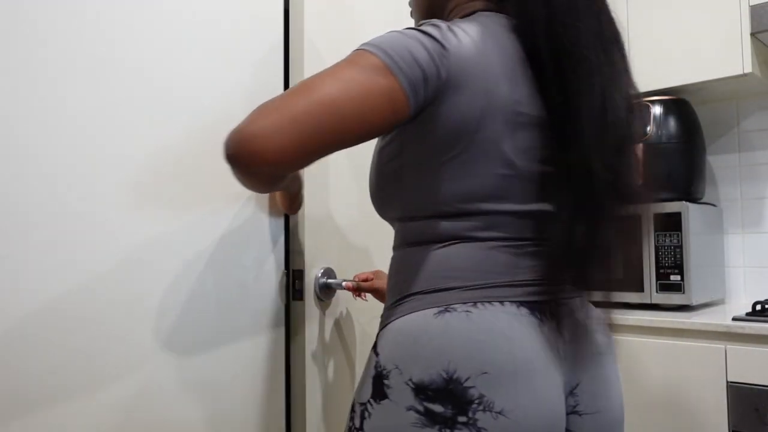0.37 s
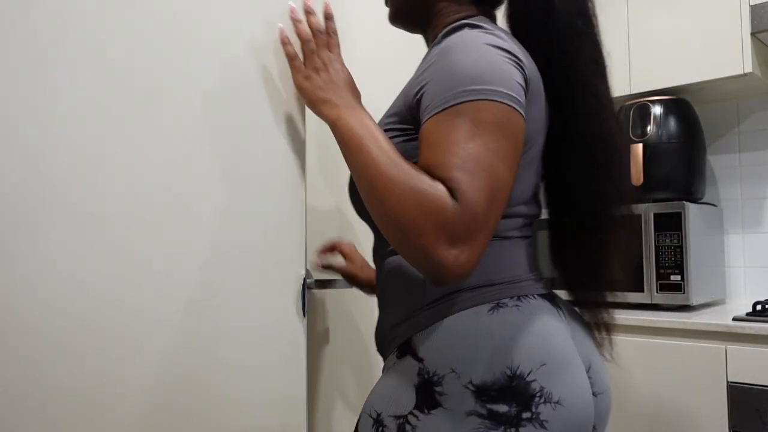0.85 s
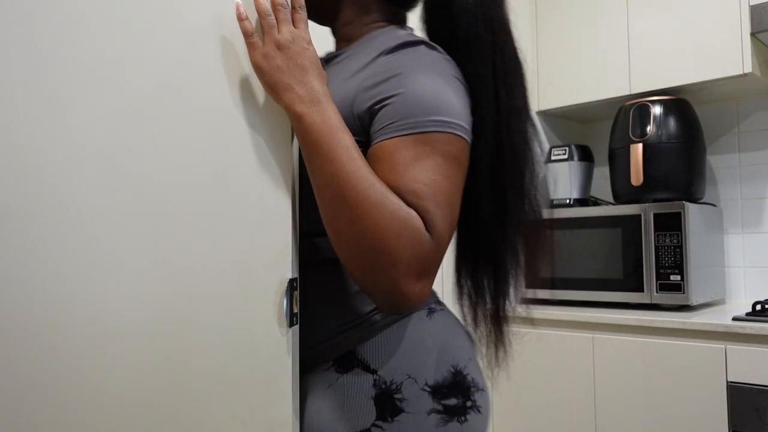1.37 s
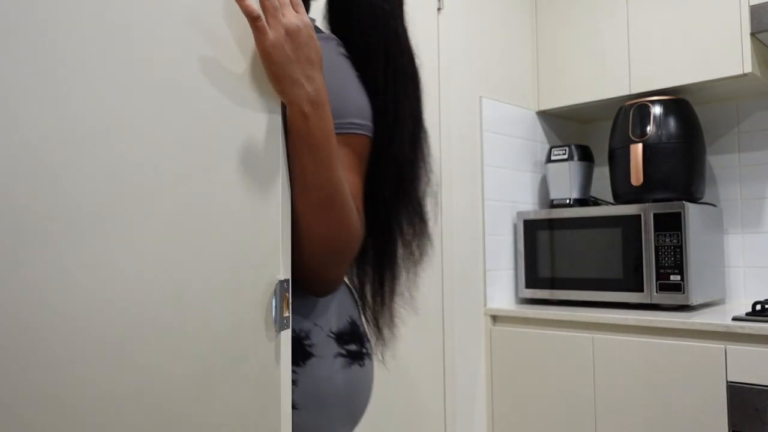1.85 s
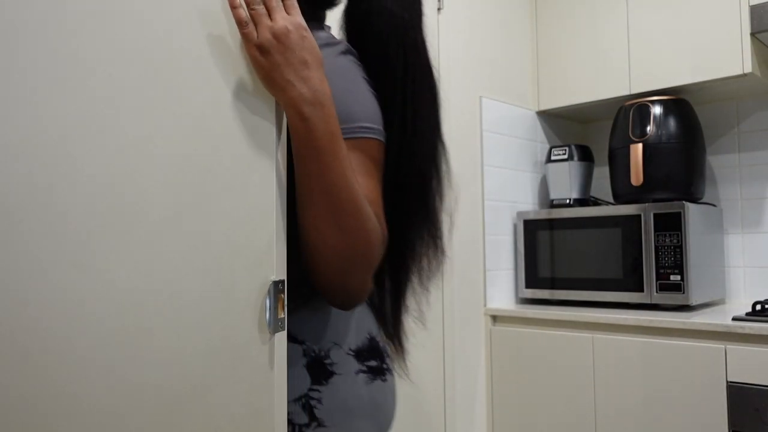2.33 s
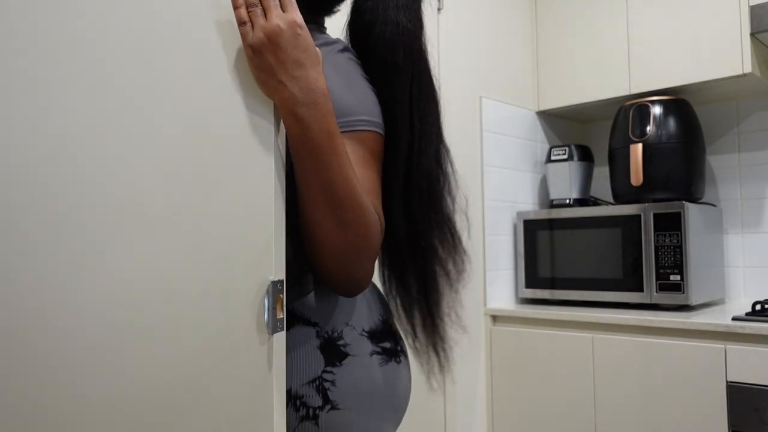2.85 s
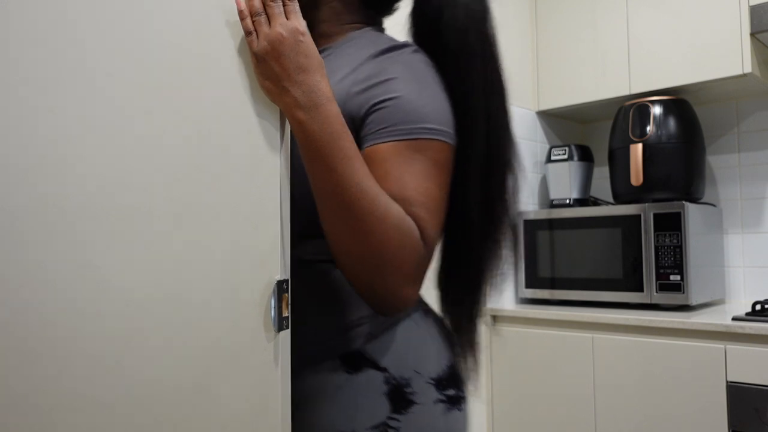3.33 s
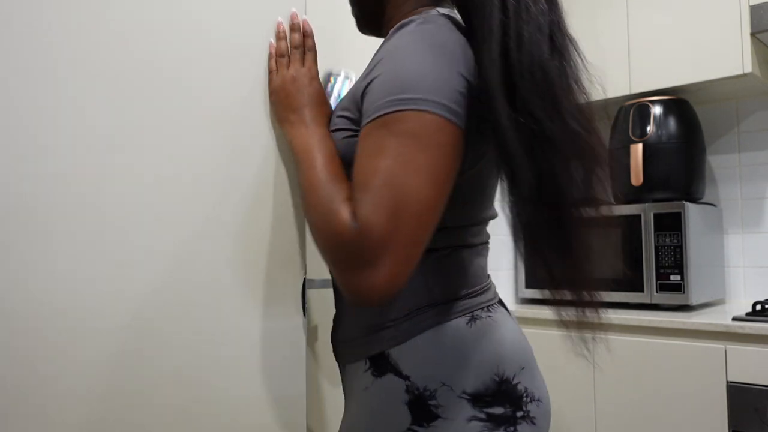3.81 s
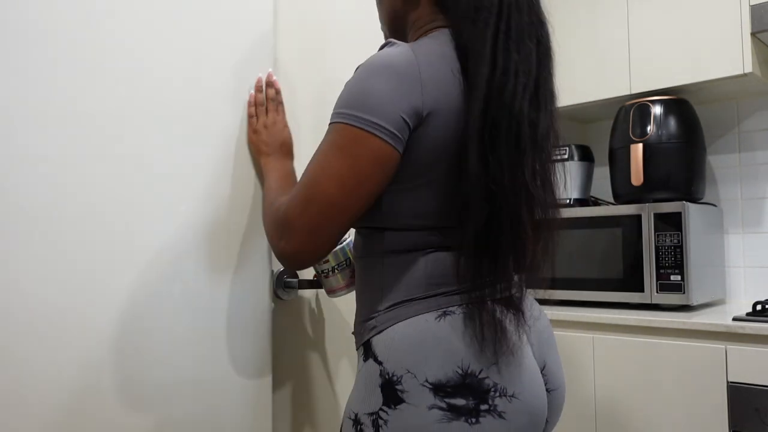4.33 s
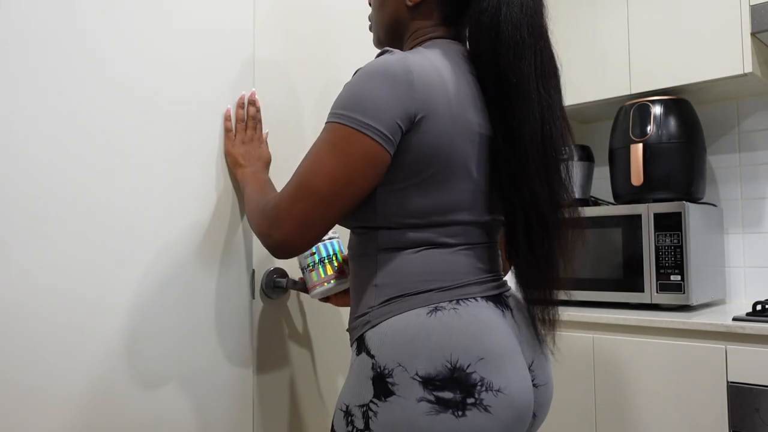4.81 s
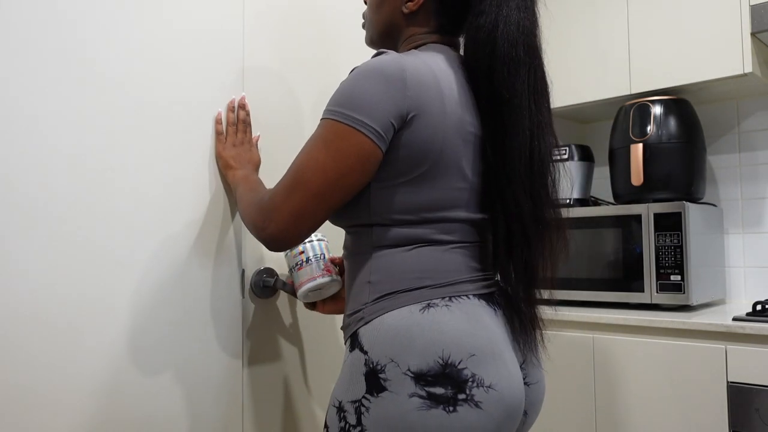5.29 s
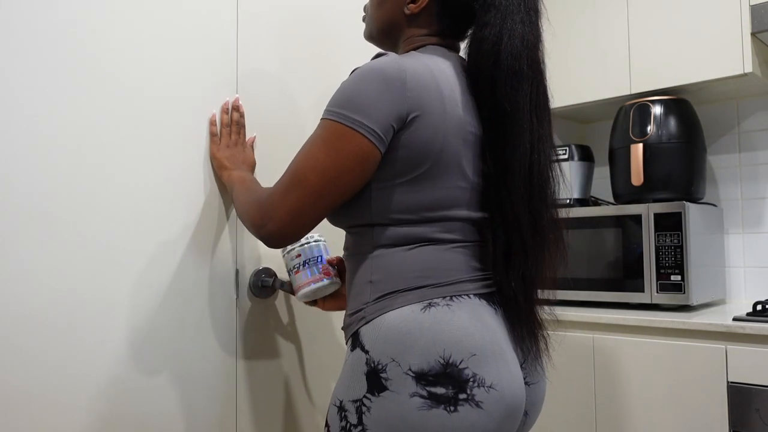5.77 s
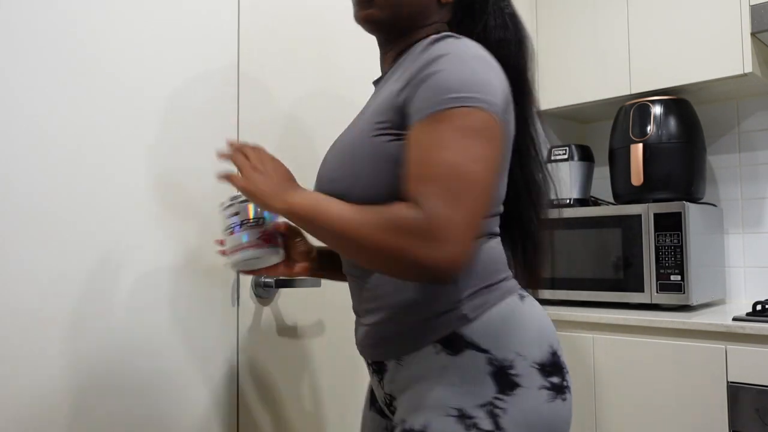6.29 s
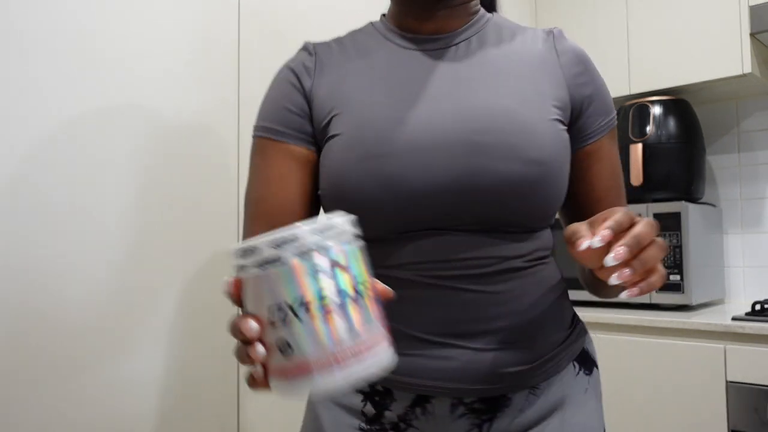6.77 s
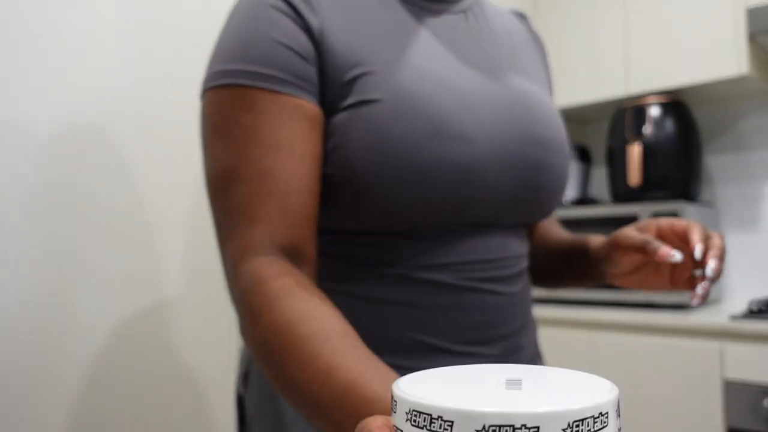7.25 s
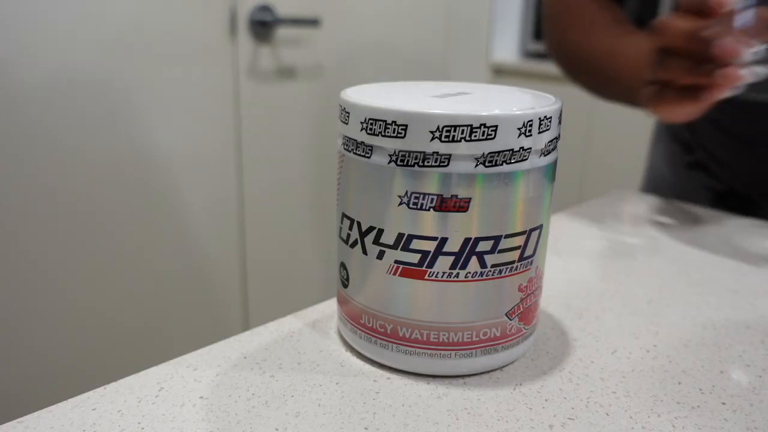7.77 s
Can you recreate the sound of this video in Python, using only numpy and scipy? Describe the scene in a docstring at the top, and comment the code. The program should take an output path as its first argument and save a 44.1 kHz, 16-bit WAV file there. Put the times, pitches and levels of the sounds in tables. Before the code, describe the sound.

Quiet kitchen tone with low rumbling and light hiss, heard by a nearby stereo microphone. Sleeves and hands brush softly. A jar shifts on a wooden shelf with a short hollow clatter, and later a tiny ping. Then a tall door is pushed shut: an uneven series of hard metallic latch clacks, edge knocks and low thumps in a short bright echo. Last comes a tight plastic knock on a stone counter.

```python
"""Low rumbling noise, soft hiss and the rustle of clothes and hands run throughout; things shift on a shelf early on.
A tall pantry door is pushed shut: its latch and handle rattle several times while the panel booms.
Last, a plastic tub is set down on a stone counter. Two microphone ports hear nearly the same sound.
Rumble, hiss and rustle are shaped noise. Each contact is a short gritty scrape through resonances, with
ringing tones, a dull push and the echo of hard walls."""
import sys
import numpy as np
from scipy import signal
from scipy.fft import rfft, irfft, next_fast_len
from scipy.io import wavfile
from scipy.ndimage import uniform_filter1d

SR = 44100
rng = np.random.default_rng(int(sys.argv[2]) if len(sys.argv) > 2 else 0)


def invert_db(x):
    """Field ratio 10**(x/20) for x, a level in decibels (scalar or array-like)."""
    u = np.asarray(x, float) / 20
    return 10 ** u


def store_wav(level_fs):
    """Save 16-bit WAV to argv[1]."""
    pcm = np.round(np.clip(np.atleast_2d(level_fs), -1, 1) * 32767)
    wavfile.write(sys.argv[1], SR, pcm.T.astype(np.int16))


N = 347375  # samples in the scene
SPAN = SR * 3 // 4  # samples kept for one contact and its echo


def unit(x):
    """Scaled to rms 1."""
    return x / np.sqrt(np.mean(x ** 2) + 1e-20)


def along(points, hz):
    """Reads a curve of (pitch_hz, value) points, with pitch on a log axis."""
    point_hz, value = np.transpose(points)
    return np.interp(np.log(hz + 1), np.log(point_hz + 1), value)


def filtered(x, response):
    """Sound whose frequencies are each multiplied by a response, which may be complex."""
    size = next_fast_len(x.shape[-1] + SR // 2)  # spare room lets the ringing die away
    spectrum = rfft(x, size) * response(np.fft.rfftfreq(size, 1 / SR))
    return irfft(spectrum, size)[..., :x.shape[-1]]


def resonances(peaks):
    """Response of parts that ring after being driven: a sum of (pitch_hz, width_hz, level_db) peaks."""
    return lambda f: sum(invert_db(db) * 1j * f * width / (hz * hz - f * f + 1j * f * width)
                         for hz, width, db in peaks)


def ports(mid, side, apart):
    """Left and right from a shared sound and a sound added to one port and taken from the other."""
    side = filtered(side, lambda hz: invert_db(along(apart, hz)))
    return np.array([mid + side, mid - side])


def swell(peak_s, db, rise_db, fall_db):
    """Gain that climbs to a peak and fades, both at a steady rate in dB per second."""
    t = np.arange(N) / SR - peak_s
    return invert_db(db - np.where(t < 0, -abs(rise_db) * t, abs(fall_db) * t))


def rush(spectrum, apart, patchy_db):
    """Stereo noise of rms 1 with patches of random gain over time and pitch."""
    cells = signal.stft(rng.standard_normal((2, N + 512)), nperseg=512)[2]
    patches = uniform_filter1d(rng.standard_normal(cells.shape[1:]), size=6, axis=0)
    patches = uniform_filter1d(patches, size=8, axis=1)
    pair = signal.istft(cells * invert_db(patchy_db * unit(patches)), nperseg=512)[1][:, :N]
    mid, side = filtered(pair, lambda hz: invert_db(along(spectrum, hz)))
    return unit(ports(mid, side, apart))


# low rumbling noise over time, stronger during the door contacts: start_s, level_db
RUMBLE_LEVEL = [(0, -51), (.3, -58.5), (.9, -59.5), (1.1, -63.5), (1.7, -60), (2.2, -60.5), (3, -60),
                (3.6, -59), (4.1, -53), (4.6, -54), (7.2, -54.5), (7.88, -64)]
# colour of the rumble: pitch_hz, level_db per Hz
RUMBLE_COLOUR = [(18, -70), (30, -30), (76, -12.5), (134, -10.5), (162, 1), (195, -2.5), (262, -5),
                 (339, -13.5), (500, -20.5), (650, -29), (1100, -120)]
# colour of the hiss: pitch_hz, level_db per Hz
HISS_COLOUR = [(180, -45), (300, -2), (398, -8), (574, -5), (1870, -12), (3580, -19), (6000, -20.5),
               (13100, -25.5), (16000, -24.5)]
# how far the ports differ in far noise: pitch_hz, side_db relative to mid
FAR_DIFFERENCE = [(60, -6), (180, -10.5), (550, -4.5), (1650, -4.5), (4970, -6), (15000, -20)]


def background():
    """Low rumbling noise whose level changes, stronger during the door contacts, over steady hiss."""
    rumble_gain = invert_db(np.interp(np.arange(N) / SR, *np.transpose(RUMBLE_LEVEL)))
    rumble = rumble_gain * rush(RUMBLE_COLOUR, FAR_DIFFERENCE, patchy_db=0.7)
    hiss = invert_db(-61.5) * rush(HISS_COLOUR, FAR_DIFFERENCE, patchy_db=1)
    return rumble + hiss


# strokes of cloth and skin: peak_s, body_db, treble_db, swelling in dB per s, fading in dB per s
STROKES = [(.02, -68, -79, 200, 60), (.45, -74, -69, 300, 110), (.676, -69, -66, 350, 250),
           (1.222, -66, -56.5, 200, 150), (1.31, -53, -56.5, 150, 120), (1.69, -68.5, -59.5, 61, 113),
           (2.3, -50, -46.5, 296, 2000), (2.75, -69, -92, 500, 63), (3.1, -94, -67.5, 600, 23),
           (3.334, -61.5, -63, 1200, 150), (3.944, -61.5, -54.5, 60, 44), (4.332, -77, -46.5, 1500, 152),
           (6.648, -56.5, -50.5, 56, 77), (7.048, -56.5, -49.5, 458, 155), (7.5, -61.5, -62, 93, 37)]
# colour of the strokes' body: pitch_hz, level_db per Hz
CLOTH_COLOUR = [(800, -15), (1600, -10.5), (2600, 0), (3600, -5.5), (6000, -30)]
# colour of the strokes' treble: pitch_hz, level_db per Hz
SHEEN_COLOUR = [(3000, -5.5), (5500, -0.5), (9000, -7), (15500, -14.5)]
# how far the ports differ in near sound: pitch_hz, side_db relative to mid
NEAR_DIFFERENCE = [(60, -30), (200, -29), (600, -11.5), (2000, -15), (6000, -22.5), (12000, -18)]


def rustle():
    """Sleeves and palms slide over skin and paint: patchy noise that swells and fades with each stroke."""
    body = sum(swell(s, db, rise_db, fall_db) for s, db, _, rise_db, fall_db in STROKES)
    treble = sum(swell(s, db, rise_db, fall_db) for s, _, db, rise_db, fall_db in STROKES)
    cloth = body * rush(CLOTH_COLOUR, NEAR_DIFFERENCE, patchy_db=4)
    sheen = treble * rush(SHEEN_COLOUR, NEAR_DIFFERENCE, patchy_db=3.5)
    return cloth + sheen


def ring(modes, attack_s, scatter_db):
    """Fading tones of a struck object, struck with new strengths each time."""
    t = np.arange(SPAN) / SR
    tones = np.zeros(SPAN)
    for hz, db, t60_s in modes:
        strength_db = db + scatter_db * rng.standard_normal()
        tones += invert_db(strength_db - 60 * t / t60_s) * np.sin(2 * np.pi * hz * t)
    return tones * (1 - np.exp(-t / attack_s))


# how long the echo of the hard walls lasts: pitch_hz, t60_s (time to fade by 60 dB)
ECHO_TIME = [(100, 0.7), (400, 0.5), (1500, 0.57), (4000, 0.43), (8000, 0.42), (15000, 0.14)]


def kitchen(x, wet_db):
    """Direct sound, shaded a little at one port, plus a fresh tail whose pitches die at their own speeds."""
    lead_s = 8e-6  # direct sound reaches one port this much before the other
    hz, t, cells = signal.stft(rng.standard_normal((2, SPAN)), SR, nperseg=256)
    fade = invert_db(-60 * t / along(ECHO_TIME, hz)[:, None])
    tail = signal.istft(cells * fade, SR, nperseg=256)[1][:, :SPAN]
    tail = tail * (1 - np.exp(-np.arange(SPAN) / SR / 0.00058))  # echoes thicken as walls join in
    tail = tail / np.linalg.norm(tail[0])
    mid, side = invert_db(wet_db) * signal.fftconvolve(x[None], tail, axes=1)[:, :SPAN]
    lead = np.gradient(x) * SR * lead_s / 2  # adding a little slope shifts a sound slightly earlier
    return ports(x + mid, side - 0.2 * x, NEAR_DIFFERENCE) + [lead, -lead]


# bright part of a contact: pitch_hz, level_db per Hz
BRIGHT_COLOUR = [(4000, -5.5), (7000, -9), (11000, -20), (16000, -44)]
# dull body of a push: pitch_hz, level_db per Hz
THUD_COLOUR = [(30, -43), (70, -6), (130, 8), (220, 3), (330, -19), (600, -43)]


def blows(events, low, middle, high, attack_s, thud_db, thud_hz, wet_db):
    """Each contact is a short gritty scrape through the hard parts and a push that rings the soft ones."""
    out = np.zeros((2, N + SPAN))
    t = np.arange(SPAN) / SR
    short = SPAN // 4  # samples kept for the scrape
    for start_s, db, low_db, middle_db, treble_db, centre_hz, scrape_s in events:
        u = t[:short] / max(scrape_s, .0002)
        grit = rng.standard_normal((2, short)) * u * np.exp(-u)

        # the row's centre sets a broad colour; small modes vary in level at random
        peaks = [(centre_hz, 0.95 * centre_hz, 0)]
        peaks += [(hz, width, level - 7.0 + 2.2 * rng.standard_normal()) for hz, width, level in high]
        hard = filtered(grit[0], lambda hz: resonances(peaks)(hz) / (1 + 1j * hz / (2.35 * centre_hz)) ** 2)
        bright = filtered(grit[1], lambda hz: invert_db(along(BRIGHT_COLOUR, hz)))
        crack = hard / np.abs(hard).max() + invert_db(treble_db) * bright / np.abs(bright).max()

        # the push: noise weakened below thud_hz, fading by 60 dB in 0.44 s
        thud = unit(filtered(rng.standard_normal(SPAN),
                             lambda hz: invert_db(along(THUD_COLOUR, hz)) / (1 + (thud_hz / (hz + 1)) ** 4)))
        thud = invert_db(thud_db - 60 * t / 0.44) * (1 - np.exp(-t / attack_s)) * thud
        boom = ring(low, attack_s, scatter_db=1) + thud

        knock = invert_db(middle_db) * ring(middle, attack_s / 2, scatter_db=3.5)
        knock[:short] += crack
        contact = kitchen(knock, wet_db) + invert_db(low_db) * ports(boom, -boom, NEAR_DIFFERENCE)
        start = round((start_s - .6 * scrape_s) * SR)  # the scrape swells before it is heard as a blow
        out[:, start:start + SPAN] += invert_db(db) * contact
    return out[:, :N]


# things shifted on a shelf: start_s, hard_db, board_db and treble_db relative to hard, hard_centre_hz
SHELF_CONTACTS = [(.222, -45, -27, -25, 2620), (.264, -34.5, -29.5, -7.5, 2000), (.685, -59, 7, -16, 1200),
                  (2.305, -28, -13, -23, 1460), (2.324, -22, -8.5, -14.5, 1440),
                  (2.345, -32.5, -1.5, -25, 1280)]
# tones of the shelf board: pitch_hz, level_db (relative), t60_s
BOARD_TONES = [(132, -28, 0.18), (195, 7, 0.15), (234, -1.5, 0.33), (295.4, 0, 0.18)]
# tones of the jars: pitch_hz, level_db (relative), t60_s
JAR_TONES = [(321, 2, 0.055), (382, 1, 0.061), (438, -2.5, 0.066), (530, -3, 0.05), (600, -4, 0.051),
             (697, -16, 0.07)]
# resonances of the shelf goods: pitch_hz, width_hz, level_db (relative)
CLATTER_PEAKS = [(955, 55, -17), (1470, 57, 7.5), (2420, 120, -17), (3330, 230, -1), (5750, 74, -3)]


def shelf():
    """Things shift on a board: what shakes the board shakes the jars on it."""
    rows = []
    for s, db, board_db, treble_db, hz in SHELF_CONTACTS:
        jar_db = 5 + 0.82 * board_db  # relative to the hard part
        rows.append((s, db, board_db, jar_db, treble_db, hz, .007))  # scrape length in s
    return blows(rows, BOARD_TONES, JAR_TONES, CLATTER_PEAKS, attack_s=0.0055, thud_db=3, thud_hz=112, wet_db=2)


# faint wavering tones inside the pantry: pitch_hz, level_db (relative, applied twice)
WHINE_TONES = [(972, -2), (1450, 0), (2040, -6), (2450, -3)]
# their one swell: peak_s, level_db, swelling in dB per s, fading in dB per s
WHINE_RISE = (2, -69, 35, 70)


def whine():
    """Faint wavering tones: narrow bands of noise that swell and fade."""
    lines = [(hz, 14, db) for hz, db in WHINE_TONES]  # each resonance is 14 Hz wide
    tones = filtered(rng.standard_normal(N), lambda hz: resonances(lines)(hz) ** 2)  # squared: narrower
    return swell(*WHINE_RISE) * unit(tones)


# tones of a small jar: pitch_hz, level_db (relative), t60_s
GLASS_TONES = [(2330, 3, .07), (2450, -2.5, 0.077), (5900, -4, .12)]
# when it is touched: start_s, level_db
GLASS_TOUCHES = [(3.334, -52)]


def glass():
    """A small jar pings when brushed: a few high tones fade in the room."""
    out = np.zeros((2, N + SPAN))
    for start_s, db in GLASS_TOUCHES:
        start = round(start_s * SR)
        ping = ring(GLASS_TONES, attack_s=0.0016, scatter_db=1.5)
        out[:, start:start + SPAN] += invert_db(db) * kitchen(ping, wet_db=-8)
    return out[:, :N]


# latch, handle and door contacts: start_s, hard_db, panel_boom_db and edge_knock_db relative to hard,
# hard_centre_hz
DOOR_CONTACTS = [(4.192, -38, -21, -15, 5100), (4.238, -33.5, 7.5, 12.5, 4300),
                 (4.322, -37.5, -1, 5.5, 6600), (4.515, -41.5, -29, -9, 1953), (4.584, -14, -14, -14, 2276),
                 (4.623, -14, -17, -11, 3037), (4.856, -13, -2.5, -11, 1901),
                 (4.894, -16.5, -16, -19, 2957), (5.016, -25, -8, -12.5, 2544), (5.202, -47, 6, 0, 1470),
                 (5.357, -27.5, -11.5, -17, 2810), (5.389, -24.5, -37, -20, 3720),
                 (5.5593, -10.5, -15.5, -2.5, 3586), (5.614, -20.5, -5.5, -2, 3250),
                 (5.752, -12, -9, -2.5, 3330), (5.817, -24.5, -1, 5.5, 1867), (5.857, -21, -3.5, 0.5, 3027),
                 (5.896, -29, -0.5, 2.5, 1780), (5.969, -28.5, -5.5, -3, 1780),
                 (6.034, -20, -16.5, -10.5, 1495), (6.089, -23.5, -28, -19, 2580),
                 (6.154, -13.5, -17.5, -4.5, 2960), (6.418, -22.5, -16.5, -7.5, 2570),
                 (6.54, -36, -3.5, -7, 3016), (6.582, -34.5, -3, -15, 1550), (6.699, -42, 1.5, -5, 4990),
                 (6.773, -45.5, 1.5, 0, 800), (6.852, -53.5, 8.5, 2, 800)]
# tones of the door panel: pitch_hz, level_db (relative), t60_s
PANEL_TONES = [(48.3, -17.5, 0.57), (84.5, -8.5, 0.31), (147.16, 2.5, 0.54), (192.7, 6.5, 0.22),
               (225.5, -4.5, 0.35)]
# tones of the door edge: pitch_hz, level_db (relative), t60_s
EDGE_TONES = [(246, -6.5, 0.11), (288.5, 2, 0.057), (338, 0.5, 0.069), (403.6, -5.5, 0.083),
              (479, -8, 0.056)]
# resonances of latch and handle: pitch_hz, width_hz, level_db (relative)
LATCH_PEAKS = [(612, 33, 6.5), (708, 58, 3.5), (793, 87, 13), (978, 132, 13), (1113, 78, 4), (1780, 130, 8),
               (2410, 46, -21), (2820, 1000, 2), (3520, 1500, 5.5), (4160, 230, 7), (4540, 110, -15)]


def door():
    """Latch and handle rattle, edge knocks, panel booms; higher contacts are shorter and carry more treble."""
    clink_hz = 2480  # a contact centred here has -4.5 dB of treble and a 4.8 ms scrape
    rows = []
    for s, db, boom_db, edge_db, hz in DOOR_CONTACTS:
        treble_db = -4.5 + 8 * np.log2(hz / clink_hz)  # 8 dB more per octave
        scrape_s = np.clip(.0048 * (clink_hz / hz) ** 2, .002, .0085)
        rows.append((s, db, boom_db, edge_db, treble_db, hz, scrape_s))
    return blows(rows, PANEL_TONES, EDGE_TONES, LATCH_PEAKS, attack_s=0.013, thud_db=0.5, thud_hz=25, wet_db=-0.5)


# two late door contacts shake the panel: peak_s, level_db, fading in dB per s
PANEL_SHAKES = [(6.439, -34.5, 195), (6.604, -51.5, 30)]


def panel_shake():
    """Two late door contacts shake the panel: low noise rings through its tones and fades."""
    peaks = [(hz, 2.2 / t60_s, db) for hz, db, t60_s in PANEL_TONES]  # longer ringing means a narrower peak
    shakes = sum(swell(s, db, 894, fall_db) for s, db, fall_db in PANEL_SHAKES)  # swelling at 894 dB per s
    return shakes * unit(filtered(rng.standard_normal(N), resonances(peaks)))


# the tub's rim meets the counter: start_s, hard_db, base_db and treble_db relative to hard, hard_centre_hz
TUB_CONTACTS = [(7.2192, -15.5, -14.5, -36, 1100), (7.239, -12, -25.5, -1.5, 1450)]
# tones of the tub on the counter: pitch_hz, level_db (relative), t60_s
BASE_TONES = [(93, -18, .15), (178, -12, 0.18), (196, 0.5, 0.17)]
# tones of the tub wall: pitch_hz, level_db (relative), t60_s
WALL_TONES = [(303, 7.5, 0.02), (370, 8.5, 0.025), (505, 7, 0.017), (614, 2.5, 0.017), (962, -0.5, 0.03)]
# resonances of the rim: pitch_hz, width_hz, level_db (relative)
RIM_PEAKS = [(3380, 590, 7.5), (5320, 240, 9), (7140, 330, -19)]


def tub():
    """Plastic on stone: very short contacts ring the tub's rim, wall and base."""
    wall_db, scrape_s = -8, 0.00044  # wall ring relative to the hard part
    rows = [(s, db, base_db, wall_db, treble_db, hz, scrape_s) for s, db, base_db, treble_db, hz in TUB_CONTACTS]
    return blows(rows, BASE_TONES, WALL_TONES, RIM_PEAKS, attack_s=0.0049, thud_db=0, thud_hz=110, wet_db=-6.0)


# all sound dips briefly: centre_s, half_length_s, depth_db
BRIEF_DIP = (7, 0.0057, 17)


def scene():
    """Everything in the kitchen at the two ports, with one brief dip in level."""
    centre_s, half_s, depth_db = BRIEF_DIP
    dip = invert_db(-depth_db * np.exp(-((np.arange(N) / SR - centre_s) / half_s) ** 2))
    return dip * (background() + rustle() + shelf() + whine() + glass() + door() + panel_shake() + tub())


def top_cut(x):
    """Nothing passes above the cut-off."""
    return signal.sosfilt(signal.butter(12, 16520, fs=SR, output="sos"), x)


def record(dry):
    """Deepest bass is weakened, and the band ends sharply near 15.5 kHz."""
    low_hz, top_hz = 46.7, 15470

    def band(hz):
        """Bass falls away below low_hz; everything above top_hz is 25 dB weaker."""
        return (1j * hz / (low_hz + 1j * hz)) ** 2 * invert_db(-25 * (hz > top_hz))

    heard = filtered(dry, band)
    return top_cut(heard)


dry = scene()
out = record(dry)
store_wav(out)
```